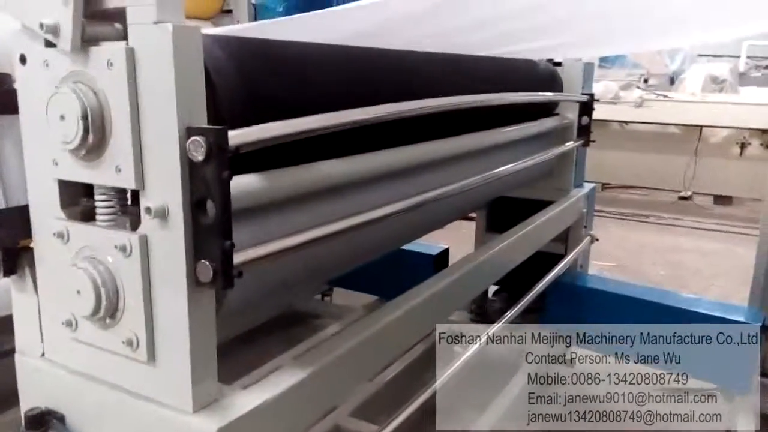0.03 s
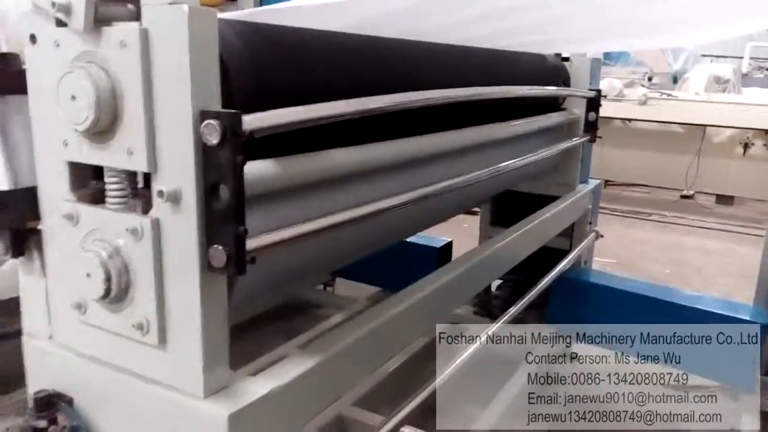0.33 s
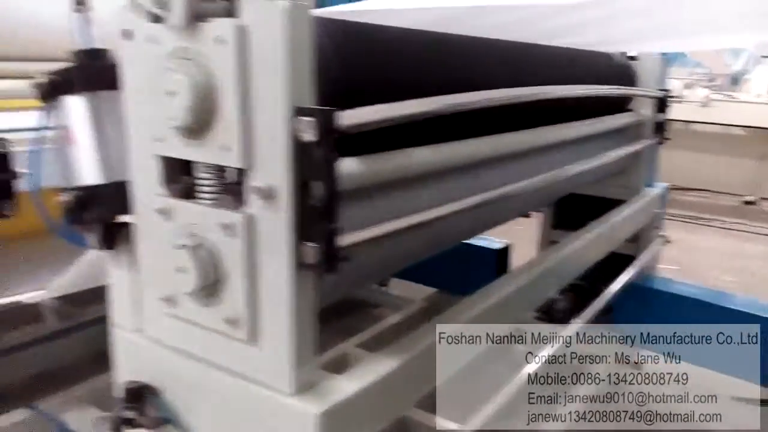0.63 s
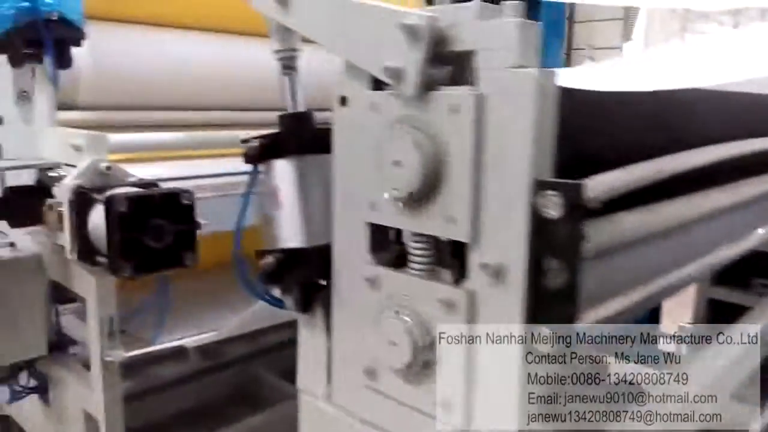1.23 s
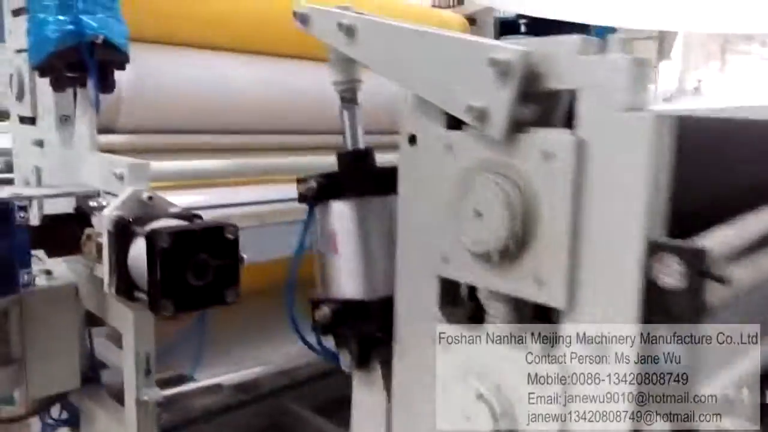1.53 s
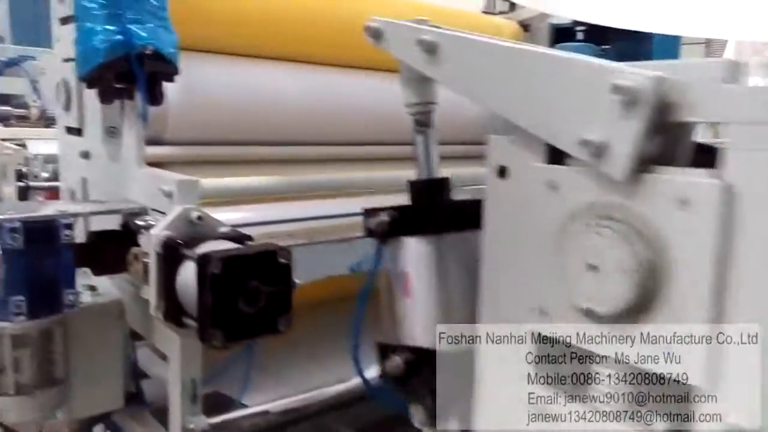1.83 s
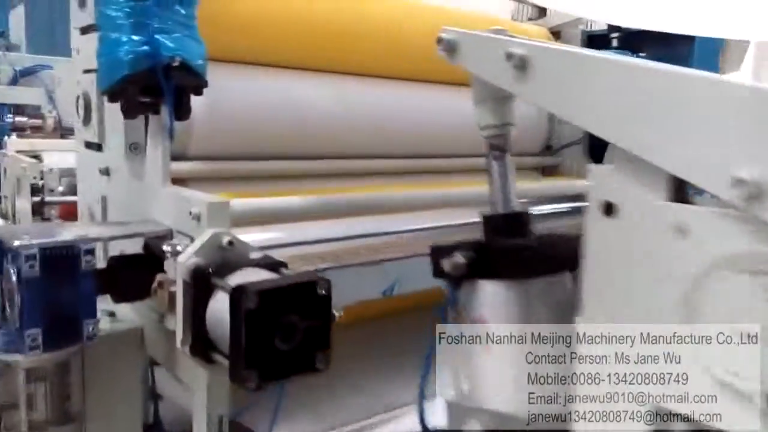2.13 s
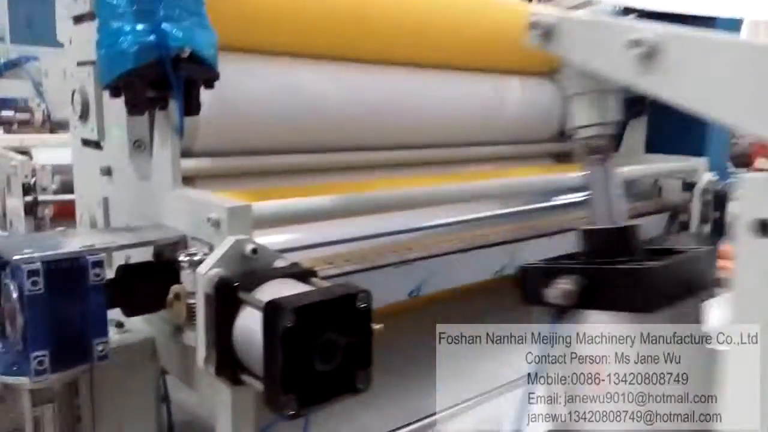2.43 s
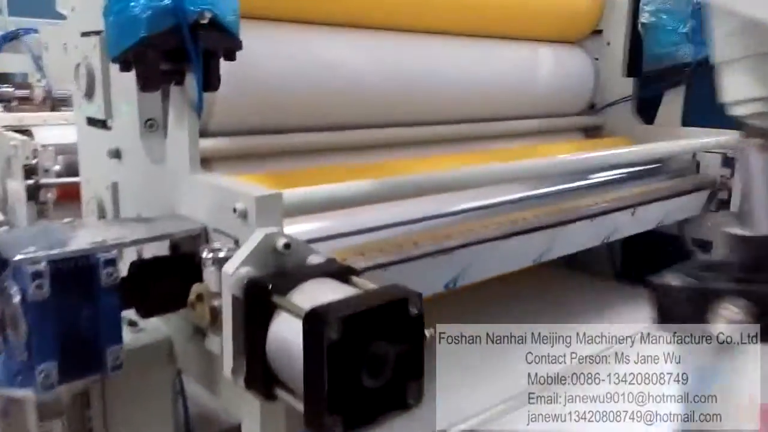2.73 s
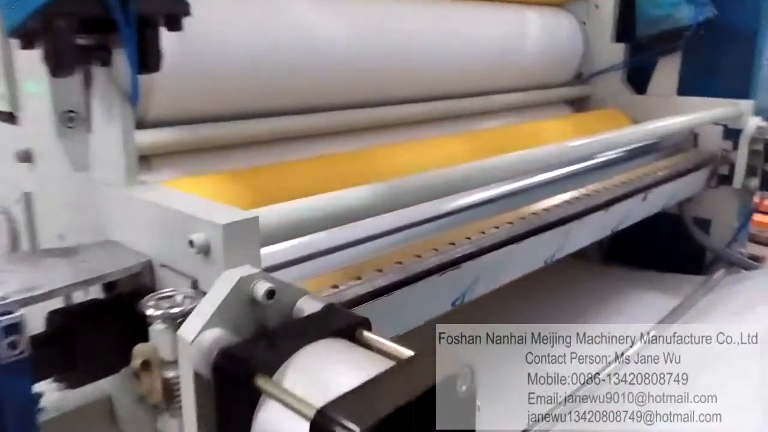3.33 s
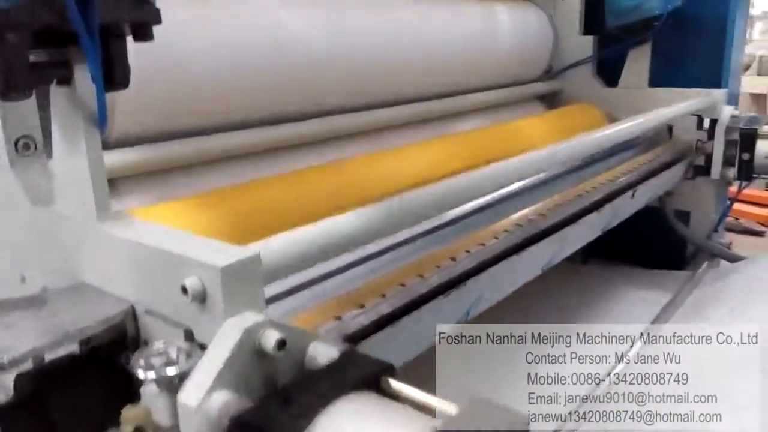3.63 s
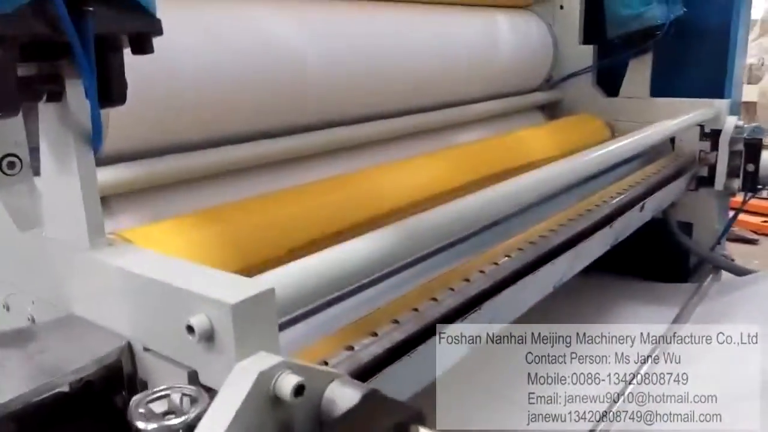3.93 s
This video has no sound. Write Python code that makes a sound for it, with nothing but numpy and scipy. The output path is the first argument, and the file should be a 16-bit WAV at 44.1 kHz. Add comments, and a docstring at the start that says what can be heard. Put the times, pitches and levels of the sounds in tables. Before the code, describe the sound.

An industrial paper machine works throughout, its blades shearing in a fast, even rhythm of gritty scrapes and metallic squeals, close and to the right. Underneath are roller rumble, motor hum, a thin whine and hissing paper, with slight factory echo.

```python
"""A paper rewinder runs steadily in a factory hall. From the start, rollers and gears rumble, motors hum,
a drive whines and the paper web hisses. On the right, the four slanted blades of the perforating roller
shear along a fixed knife, about six strokes a second: each bites with a chirp and a zing, scrapes grittily
and sings a falling squeal that flares as it slips off. The hall adds a dull tail. Some strokes end in a
brief bright crackle, like overload. Now and then a roller knocks the frame or the paper swishes."""
import sys
import numpy as np
from scipy import signal
from scipy.fft import rfft, irfft
from scipy.io import wavfile
from scipy.ndimage import uniform_filter1d, minimum_filter1d

SR = 44100
rng = np.random.default_rng(int(sys.argv[2]) if len(sys.argv) > 2 else 0)


def generate_wav(sig):
    """Save sig (samples, or channels by samples) to the path in sys.argv[1] as 16-bit PCM at SR."""
    pcm = np.round(np.clip(np.atleast_2d(sig).T, -1, 1) * 32767).astype(np.int16)
    wavfile.write(sys.argv[1], SR, pcm)


N = 176400

# narrow, sizzling treble of blades and paper: freq_hz, level_db
SIZZLE_SPECTRUM = [(3000, -32), (4800, -9), (5800, -5.5), (6550, 3), (7100, -1), (7600, -2), (8100, -20.5),
                   (10000, -45), (15000, -80)]
# broad, airy treble of crackles and swishes: freq_hz, level_db
SWISH_SPECTRUM = [(3000, -17.5), (5500, 3), (6700, 3.5), (8200, -6), (10000, -2.5), (12000, -4.5),
                  (15500, -12.5)]


def undb(db):
    return 10 ** (np.asarray(db) / 20)


def unit(x):
    return x / np.sqrt(np.mean(x ** 2))


def times():
    return np.arange(N) / SR


def curve(rows):
    """Gain over time from (time_s, level_db) rows, around their mean."""
    time_s, db = np.array(rows).T
    return undb(np.interp(times(), time_s, db - db.mean()))


def pan(db):
    """Left and right gains for a level difference; negative is to the right."""
    return unit(undb(np.array([[db], [-db]]) / 2))


def walk(rate_hz):
    """Smooth random drift with a spread of 1."""
    f = np.fft.rfftfreq(N, 1 / SR)
    return unit(irfft(rfft(rng.standard_normal(N)) / (1 + (f / rate_hz) ** 2), N))


def colour(x, points):
    """EQ through (freq_hz, level_db) points."""
    hz, db = np.array(points).T
    f = np.fft.rfftfreq(N, 1 / SR) + 1
    return irfft(rfft(x) * undb(np.interp(np.log(f), np.log(hz), db)), N)


def gate(age, hold_s, release_s, attack_s=.012):
    """Linear attack, then an exponential release from hold_s on."""
    return np.clip(age / attack_s, 0, 1) * np.exp(-np.maximum(age - hold_s, 0) / release_s)


def bump(age, half_s):
    return np.exp(-(age / half_s) ** 2)


def rollers():
    """Rollers and gears rumble, throb and judder; the bass sits near the centre."""
    # body of the rumble: freq_hz, level_db
    spectrum = [(15, -34.5), (25, -17.5), (62, -24.5), (100, -13), (150, -8.5), (185, -5.5), (240, -2),
                (300, -1), (370, -0.5), (450, -3.5), (560, -6.5), (750, -8), (1000, -13), (2000, -20.5),
                (3000, -44)]
    # stereo width: freq_hz, side_minus_mid_db
    width = [(30, -16), (120, -23), (280, -15), (500, -9), (900, -5), (2000, 2.5)]
    # slow swell: time_s, relative_db
    swell = [(0, 2.5), (.4, .5), (.65, 0), (1.2, 0.6), (1.4, 2), (1.65, 1.5), (1.9, 2.6), (2.3, 0.5),
             (2.9, 1.4), (3.3, 1.5), (3.85, 0.5)]
    # two out-of-balance rollers beating against each other: turns_per_s, heavy_moment_s, depth_db
    throbs = [(8.0, 0.393, 0.8), (8.375, 0.376, 0.73)]
    mid, side = rng.standard_normal((2, N))
    noise = mid + colour(side, width) * np.array([[1], [-1]])
    throb_db = sum(db * np.cos(2 * np.pi * rate * (times() - s)) for rate, s, db in throbs)
    rumble = unit(colour(noise * undb(throb_db + walk(90)), spectrum))
    return undb(-21) * pan(-.45) * rumble * curve(swell)


def tone(hz, db, wander, nearest_s, fade_db_per_s=3):
    """A wavering tone, loudest as the listener passes its spot along the machine."""
    phase = 2 * np.pi * np.cumsum(hz * (1 + wander * walk(12))) / SR
    passing = undb(db - fade_db_per_s * np.abs(times() - nearest_s))
    return passing * unit(np.sin(phase) * undb(2 * walk(3.2)))


def motors(flutter_hz=25.5, flutter_depth=.9):
    """Hum of the motors and the thin, fluttering whine of their drive."""
    # motor tones: pitch_hz, level_db, wander_share, nearest_s
    tones = [(49.4, -52, .008, 2.4), (188.4, -35, 0.0121, 3.8), (269.5, -30, 0.0032, 3.25),
             (428.5, -30, .003, 1.7), (628, -38.5, 0.0018, 2.4), (696, -42.5, 0.0065, 2)]
    hum = sum(tone(*row) for row in tones)
    flutter = 1 + flutter_depth * np.sin(2 * np.pi * flutter_hz * times())
    return hum + pan(-2.5) * flutter * tone(hz=4002, db=-35.5, wander=.0003, nearest_s=1.5)


def grit(rate_hz, rough_db):
    """Friction: noise in tiny uneven bursts, at the same moments in both channels."""
    return unit(rng.standard_normal((2, N)) * undb(rough_db * np.clip(walk(rate_hz), -2, 2)))


def paper():
    """The running web hisses, and swishes with a rasp on the right."""
    # hiss of the web: freq_hz, level_db
    spectrum = [(800, -10.5), (1500, -3.5), (2200, -1), (3600, 5.5), (5000, 2.5), (7000, -2), (8500, -7),
                (11000, -15), (15500, -30)]
    # bright swishes, about once a second: peak_s, half_length_s, relative_db
    swishes = [(.43, 0.15, -30), (.72, 0.12, -38), (1.717, 0.047, -22.5), (2.76, .13, -33.5),
               (3.7, .17, -34)]
    hiss = undb(-24) * pan(-5) * unit(colour(grit(140, 1.5), spectrum))
    swell = sum(undb(db) * bump(times() - s, half_s) for s, half_s, db in swishes)
    bright = unit(colour(grit(500, 2.1), SWISH_SPECTRUM))
    rasp = undb(11.5) * pan(-19.5) * unit(colour(grit(350, 2.5), SIZZLE_SPECTRUM))
    return hiss + swell * (bright + rasp)


def blade_strokes(contact_s=.11, slip_s=.112):
    """Envelopes of scrape, squeal, zing, sizzle and bite, and the squeal's pitch, as blades come round."""
    # the four blades in turn: zing_length_s, slip_squeal_db, slip_sizzle_db
    blades = [(.04, -6.5, -4), (.095, -2.5, -0.5), (.04, -6, -9), (.035, -8.5, -2.5)]
    # accents of the strokes, four to a turn: start_s, scrape_db, sizzle_db, squeal_db, zing_db
    strokes = [(0.026, -1, -2.5, -4.5, -7), (0.197, 0, -0.5, 0, 0), (0.369, 1.5, 0, -2, -2),
               (0.541, 1.5, 3, -6.5, -7), (0.712, 2.5, 3, -9.5, -1.0), (0.883, 2.5, 1.5, -6, -1),
               (1.055, -1.5, 1.5, 5.5, -4), (1.227, -1.5, -2.5, 1, -0.5), (1.399, 1.0, 1.5, -2.5, 4),
               (1.57, 0.5, 0, 4, 3.0), (1.742, 1, 1.0, 4, -1.0), (1.914, -2, 0, -1.5, 2),
               (2.085, -1, -2.5, -7.5, -2.5), (2.256, -3.5, -1, -1.5, 2.5), (2.428, -1, -1.0, 4, 2.5),
               (2.6, 0.5, -3.5, 0.5, -1.0), (2.771, 0.0, -1.5, -10, -0.0), (2.942, -1, 0.5, -1.5, 3.0),
               (3.114, -2.0, -3, 5, -1.5), (3.286, -3, -1, 4, 3), (3.458, 1, 1, -0.5, -2.5),
               (3.629, -0.5, -1, -6.5, 2.5), (3.801, -1.0, -1, 2.5, 4)]
    high_hz, rest_hz, fall_s, build_s = 2809., 2632., .06, .11  # the squeal sinks as it builds
    t = times()
    scrape, squeal, zing, sizzle, bite = np.zeros((5, N))
    squeal_hz = np.full(N, rest_hz)
    for k, (start, scrape_db, sizzle_db, squeal_db, zing_db) in enumerate(strokes):
        zing_s, slip_squeal_db, slip_sizzle_db = blades[k % len(blades)]
        near = (t > start - .1) & (t < start + .5)
        age = t[near] - start
        contact = gate(age, contact_s, release_s=.027)
        build = 1 - np.exp(-np.maximum(age, 0) / build_s)
        singing = build * gate(age, contact_s, release_s=.011)
        scrape[near] += undb(scrape_db) * contact
        squeal[near] += undb(squeal_db) * (singing + undb(slip_squeal_db) * bump(age - slip_s, .011))
        zing[near] += undb(zing_db) * gate(age, zing_s, release_s=.02)
        sizzle[near] += undb(sizzle_db) * (contact + undb(slip_sizzle_db) * bump(age - slip_s, .014))
        bite[near] += bump(age - .002, half_s=.014)
        squeal_hz[near] += (high_hz - rest_hz) * gate(age, .03, fall_s)
    return scrape, squeal, zing, sizzle, bite, squeal_hz


def chatter(hz, width_hz, rate_hz, rough_db):
    """A steep steel resonance shaken by stick-slip bursts; its pitch may glide."""
    push = grit(rate_hz, rough_db) * np.exp(2j * np.pi * rng.random((2, N)))
    f = np.fft.fftfreq(N, 1 / SR)
    body = np.fft.ifft(np.fft.fft(push) / (1 + 2j * f / width_hz) ** 2)
    carrier = np.exp(2j * np.pi * np.cumsum(hz * np.ones(N)) / SR)
    return unit(np.real(body * carrier))


def perforator():
    """The blades shear along the knife; the steel keeps singing and sizzling between strokes."""
    # scrape of blade on knife: freq_hz, level_db
    spectrum = [(1000, -24.5), (2200, -12.5), (3400, -2), (4600, -3.5), (5600, 0), (7500, -5), (8300, -7),
                (9500, -8), (11500, -19.5), (15500, -30)]
    # strokes on which the squeal flares up: peak_s, relative_db
    flares = [(.148, 3.5), (.315, 1), (0.486, 7), (.655, 2), (.945, 1), (1.164, 5), (1.86, 6.5),
              (2.36, -12), (2.535, -3), (2.63, -0.5), (2.695, -1.5), (3.218, 5.5), (3.35, 0.5), (3.679, 1),
              (3.812, 1)]
    # brief bright crackles, like overload, at the ends of some strokes: peak_s, level_db
    crackles = [(.136, -13.5), (.825, -23), (1.17, -22), (2.197, -21), (3.052, -20.5), (3.4, -24.5)]
    scrape, squeal, zing, sizzle, bite, squeal_hz = blade_strokes()
    flare = sum(undb(db) * bump(times() - s, half_s=.012) for s, db in flares)
    crackle = sum(undb(db) * bump(times() - s, half_s=.012) for s, db in crackles)
    sizzle_gain = undb(-17) * unit(sizzle + 1.09) + crackle
    out = undb(-24) * pan(-5) * scrape * unit(colour(grit(600, 1.9), spectrum))
    out += pan(-26) * sizzle_gain * unit(colour(grit(310, 1.6), SIZZLE_SPECTRUM))
    out += undb(-7.5) * pan(-8.5) * crackle * unit(colour(grit(600, 3), SWISH_SPECTRUM))
    steel = chatter(squeal_hz + 25 * walk(24.6), width_hz=233, rate_hz=120, rough_db=2.9)
    out += undb(-18) * pan(-10) * unit(squeal + .69) * steel
    out += undb(-23.5) * pan(-12.5) * unit(flare) * chatter(2606, width_hz=150, rate_hz=100, rough_db=1.5)
    out += undb(-23) * pan(-6) * bite * chatter(3074, width_hz=290, rate_hz=200, rough_db=1.6)
    return out + undb(-23) * pan(-5) * zing * chatter(5185, width_hz=380, rate_hz=200, rough_db=2)


def hall(x, t60_s=1):
    """A diffuse, duller tail from the factory walls."""
    # tone of the reflections: freq_hz, level_db
    walls = [(3000, 1.5), (6000, 1), (9000, -14)]
    t = times()
    tail = rng.standard_normal((2, N)) * np.exp(-np.log(1000) * t / t60_s) * (t > .008)
    tail /= np.sqrt(np.sum(tail ** 2, axis=1, keepdims=True))
    return undb(-7) * signal.fftconvolve(colour(x, walls), tail, axes=1)[:, :N]


def frame_knocks():
    """Now and then a roller bumps the frame, which rings briefly."""
    # dull knocks: start_s, pitch_hz, level_db
    knocks = [(.24, 331, -18.5), (.365, 359, -15), (.5, 350, -23), (1.384, 333, -18), (2.64, 259, -17),
              (2.745, 418, -19.5), (2.87, 328, -18), (3.25, 366, -14.5)]
    out = 0
    for start, hz, db in knocks:
        age = times() - start
        ring = np.sin(2 * np.pi * hz * age + .5 * walk(40))
        out = out + undb(db) * gate(age, hold_s=.012, release_s=.035) * ring
    return out


def scene():
    """The blades and their hall tail over the dry bed of the machine."""
    blades = perforator()
    return blades + hall(blades) + paper() + rollers() + frame_knocks() + motors()


def record(dry):
    """A fast limiter holds the highest peaks, the sound stops just before the end and the top is cut."""
    ceiling, reaction_s, stop_s, top_hz = .98, .0028, 3.885, 15400
    window = int(reaction_s * SR)
    needed_gain = np.minimum(1, ceiling / (np.abs(dry).max(axis=0) + 1e-9))
    gain = uniform_filter1d(minimum_filter1d(needed_gain, window), window)
    fade = np.clip((stop_s - times()) / .005, 0, 1)
    lowpass = signal.ellip(8, .2, 70, top_hz, fs=SR, output="sos")
    return signal.sosfilt(lowpass, np.clip(dry * gain, -1, 1) * fade)


dry = scene()
out = record(dry)
generate_wav(out)
```